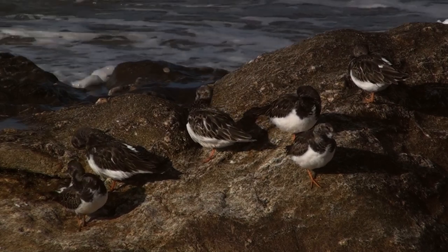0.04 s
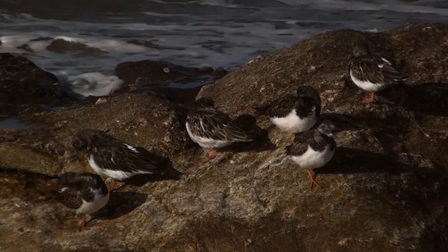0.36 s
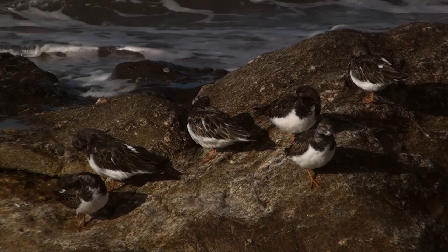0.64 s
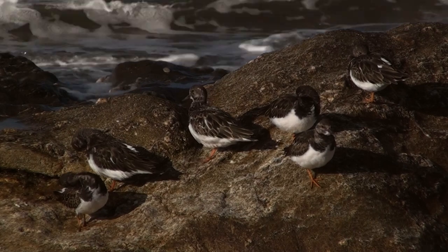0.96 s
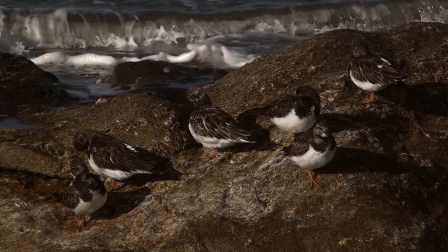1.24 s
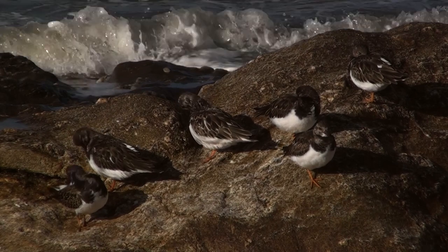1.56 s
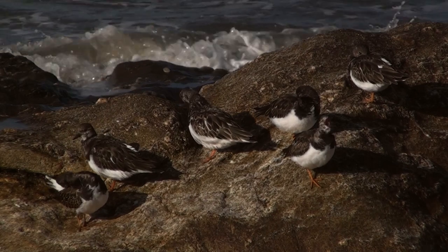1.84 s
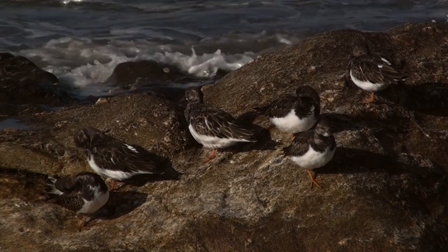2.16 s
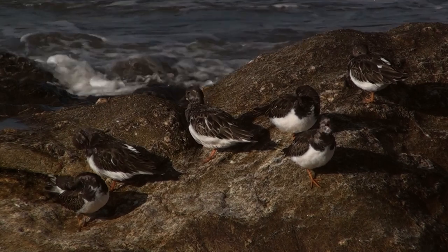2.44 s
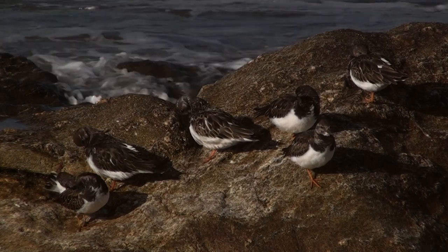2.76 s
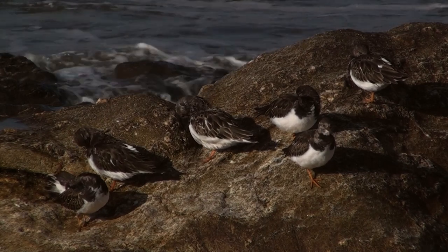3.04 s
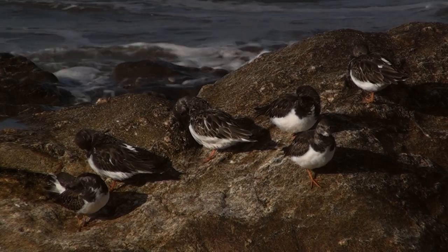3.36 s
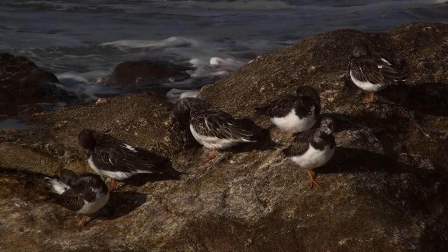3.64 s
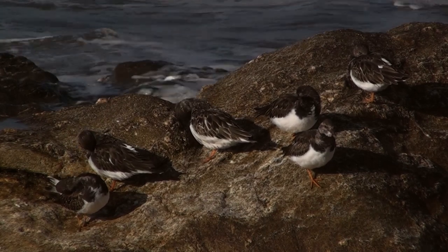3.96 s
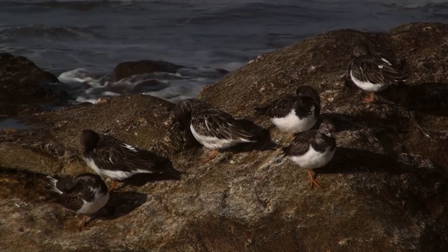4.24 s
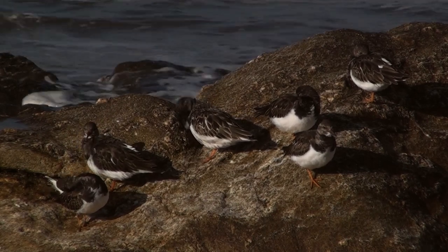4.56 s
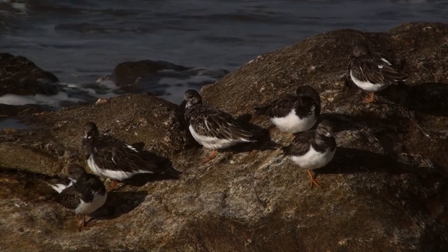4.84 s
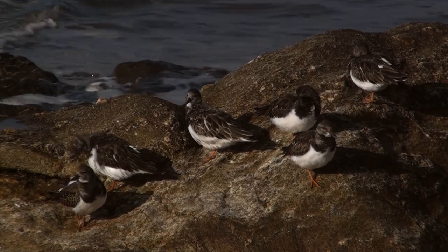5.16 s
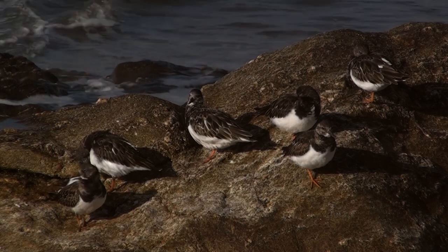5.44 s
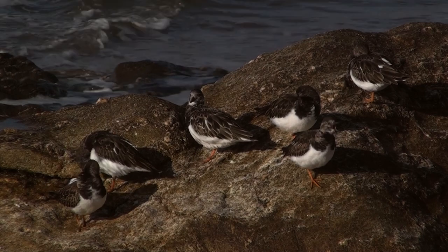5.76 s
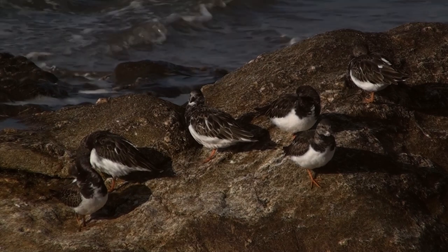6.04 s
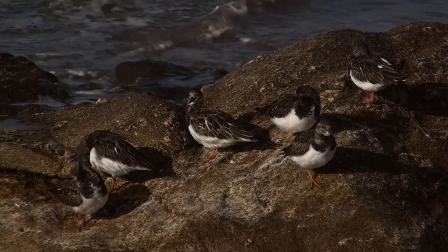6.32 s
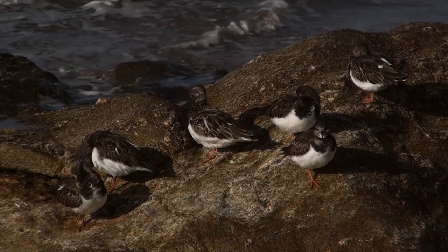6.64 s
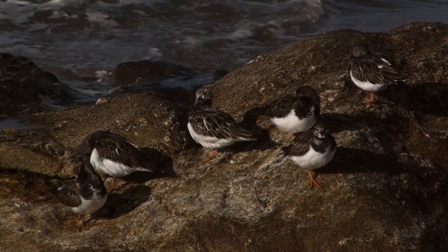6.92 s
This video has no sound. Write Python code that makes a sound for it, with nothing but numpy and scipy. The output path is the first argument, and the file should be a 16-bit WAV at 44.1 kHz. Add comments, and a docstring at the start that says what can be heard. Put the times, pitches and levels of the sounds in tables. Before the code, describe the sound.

Surf washes steadily on a rocky shore while a small bird repeats brief, high, slightly raspy single calls.

```python
"""From the start, surf rumbles steadily on a rocky shore: the sound of countless bursting bubbles. After 0.4 s
one short, high, falling call of a turnstone, a small shorebird, sounds, and it comes seven times, each time
alike. Each call cracks open, holds a clear tone whose second harmonic rings in the throat, then sags and frays.
A faint echo off the rocks and a thin ring follow each one. The hiss of foam slowly grows, and after the last
call, near 6 s, the sea goes on alone."""
import sys
import numpy as np
from scipy import signal
from scipy.fft import rfft, irfft, next_fast_len
from scipy.io import wavfile
from scipy.ndimage import uniform_filter1d

SR = 44100
rng = np.random.default_rng(int(sys.argv[2]) if len(sys.argv) > 2 else 0)


def transcribe(u):
    """Save the signal u as a 16-bit wav file named by the first command-line argument.

    u: samples, shape (n,) or (channels, n), limited to [-1, 1]; the rate is SR.
    q: integer samples, one column per channel.
    """
    v = np.clip(np.atleast_2d(u).T, -1, 1)
    q = np.round(v * 32767).astype(np.int16)
    wavfile.write(sys.argv[1], SR, q)


N = 317079

# How strong the surf is from low to high: frequency_hz, relative_level_db
SURF_SPECTRUM = [(22, -29), (50, -12), (100, -3.5), (140, -1.55), (205, 1), (335, -9.5), (490, -5.5),
                 (600, -8.5), (750, -15.5), (950, -15.5), (1280, -20.5), (3300, -28.5), (10300, -40.5),
                 (15000, -52.5)]
# How wide the surf sounds (left-right difference against the shared sound): frequency_hz, width_db
SURF_WIDTH = [(60, -35), (120, -44), (200, -27), (380, -17.5), (700, -11), (1290, -6.5), (2380, -5.5),
              (4400, -6.5), (8100, -6.5), (15000, -21)]
# How the sea rises and falls; only changes around each average count: time_s, wash_db, foam_db
SEA_LEVELS = [(0.0, -47.5, -60.5), (0.54, -46.5, -59.5), (1.24, -48, -60.5), (1.7, -47.5, -60),
              (2.98, -47, -59), (3.32, -48, -59.5), (4.35, -46, -59), (6.97, -45, -56),
              (7.19, -42.5, -55.5)]
# When each call begins: start_s
CALL_STARTS = [0.4, 1.72, 2.32, 2.88, 3.56, 4.32, 5.76]
# How well the throat and open bill let each frequency out: frequency_hz, gain_db
THROAT_GAIN = [(1250, -16), (1550, -24), (1820, -21), (2500, 0.5), (2800, -4.5), (3150, -0.5), (3680, -2),
               (4100, -21.5), (4700, -24.5), (5450, -31), (6100, -41), (7200, -34.5), (9000, -42.5),
               (11000, -59)]
# Where the tone breaks within a call: time_s, half_width_s, rasp_db, tone_dip_db
VOICE_BREAKS = [(.007, .003, -27, 7), (0.0121, .002, -35.5, -2.5), (0.071, 0.0074, -36, -1),
                (.088, .009, -41, 0), (.15, 0.016, -40.5, 1.8)]
# How the two microphones hear the bird: frequency_hz, left_minus_right_db, left_lead_radians
BIRD_STEREO = [(1800, 0.5, 0.27), (2900, 0.8, -0.02), (3500, -.5, 0.17), (4800, -0.5, 0.35),
               (5400, -5.5, 1.54), (7460, 9, 2), (8800, 8, 1)]

OPEN_S, PEAK_S, LET_GO_S = 0.0016, 0.019, 0.1432  # in each call: the voice opens, peaks and lets go


def undb(db):
    """Turn decibels into a number to multiply by."""
    return 10 ** (np.asarray(db) / 20)


def unit(x):
    """Scale a signal to an average (rms) level of 1."""
    return x / np.sqrt(np.mean(x ** 2))


def curves(table, size):
    """Join the points of a time table with straight lines, one value a sample."""
    times, *columns = np.transpose(table)
    return [np.interp(np.arange(size) / SR, np.sort(times), column) for column in columns]


def gain_at(table, hz):
    """Look up a frequency in a decibel table, on a scale of octaves, and return its gain."""
    table_hz, db = np.transpose(table)
    return undb(np.interp(np.log(np.maximum(hz, 1)), np.log(table_hz), db))


def colour(x, gain):
    """Turn each frequency up or down by gain(frequency)."""
    size = next_fast_len(x.shape[-1])
    hz = np.fft.rfftfreq(size, 1 / SR)
    return irfft(rfft(x, size) * gain(hz), size)[..., :x.shape[-1]]


def wobble(rate_hz, size):
    """A smooth random wobble, about 1 in size, that picks rate_hz new values a second."""
    step = max(int(SR / rate_hz), 1)
    held = np.repeat(rng.standard_normal(size // step + 1), step)
    return unit(uniform_filter1d(uniform_filter1d(held, step), step))[:size]


def bubbles(spread_db=2.5, near_share=0.29, count=20000):
    """Countless far bubbles blur into smooth noise; nearer ones pop one by one, in uneven sizes."""
    when = rng.integers(0, N, count)
    sizes = undb(spread_db * np.minimum(rng.exponential(size=count), 6))
    pops = np.bincount(when, sizes * rng.choice([-1, 1], count), N)
    return rng.standard_normal(N) + near_share * unit(pops)


def surf(level_db=-32, wash_hz=1400, foam_hz=9000, swell_db=0.06, flicker_db=0.5):
    """Churning water: the lows rumble steadily, the middle follows the wash, the highs the foam."""
    middle = colour(bubbles(), lambda f: gain_at(SURF_SPECTRUM, f))
    side = colour(bubbles(), lambda f: gain_at(SURF_SPECTRUM, f) * gain_at(SURF_WIDTH, f))
    sea = np.array([middle + side, middle - side]) * undb(level_db) / np.std(middle)
    wash_db, foam_db = (db - np.mean(db) for db in curves(SEA_LEVELS, N))
    centres_hz = np.geomspace(30, SR / 3, num=10)  # bands about an octave apart
    swell = wobble(3.1, N)
    out = 0
    for share, hz in zip(np.eye(len(centres_hz)), centres_hz):
        band = colour(sea, lambda f: np.interp(f, centres_hz, share))
        wash = np.clip(hz / wash_hz, 0, 1)
        foam = np.clip(np.log(hz / wash_hz) / np.log(foam_hz / wash_hz), 0, 1)
        motion_db = wash * (1 - foam) * wash_db + foam * foam_db
        out = out + band * undb(motion_db + swell_db * swell + flicker_db * wobble(12, N))
    return out


def since(t, start):
    """Seconds gone by since start; zero before it."""
    return np.maximum(t - start, 0)


def bump(t, centre, width):
    """A bell-shaped swell of height 1."""
    return np.exp(-((t - centre) / width) ** 2)


def noise_band(size, hz, width_hz):
    """A hiss of level 1 that holds only the frequencies around hz."""
    return unit(colour(rng.standard_normal(size), lambda f: 1 / (1 + (2 * (f - hz) / width_hz) ** 4)))


def crack(t, level_db=-33.5, hold_s=0.012, fade_db_per_s=2999.5):
    """A tiny burst of noise as the voice snaps open."""
    hiss = noise_band(len(t), hz=3930, width_hz=2000)
    return hiss * undb(level_db - fade_db_per_s * since(t, hold_s))


def pitch(t, top_hz=1812, scoop_hz=247.7, sag_hz=416, drop_hz_per_s=14000):
    """The pitch of a call in Hz: it scoops up, sags faster and faster, then drops away."""
    scoop = scoop_hz * bump(t, centre=0.0045, width=0.00685)
    sag = sag_hz * (since(t, PEAK_S) / (LET_GO_S - PEAK_S)) ** 2.12
    return top_hz - scoop - sag - drop_hz_per_s * since(t, LET_GO_S)


def effort(t, peak_db=-14.5, push_db=3.5, rise_db_per_s=598, tire_db_per_s=64.5, stop_db_per_s=1850):
    """How hard the bird sings, in dB: it swells, tires, pushes once more and lets go."""
    rise = rise_db_per_s * np.maximum(PEAK_S - t, 0)
    tiring = tire_db_per_s * since(t, PEAK_S)
    push = push_db * bump(t, centre=0.107, width=0.005)
    return peak_db - rise - tiring + push - stop_db_per_s * since(t, LET_GO_S)


def call(jitter=0.0022, flutter=0.0031, shimmer_db=0.84, harmonics=5):
    """The voice box makes a sliding tone and the throat shapes it; at each break it flutters and rasps."""
    size = SR // 6
    t = np.arange(size) / SR
    time_s, half_width_s, rasp_db, dip_db = np.transpose(VOICE_BREAKS)
    breaks = bump(t[:, None], time_s, half_width_s)  # one column for each break
    unsteadiness = jitter + flutter * breaks.sum(axis=1)
    hz = pitch(t) * (1 + unsteadiness * wobble(900, size))
    effort_db = effort(t) - breaks @ dip_db + shimmer_db * wobble(400, size)
    phase = 2 * np.pi * np.cumsum(hz) / SR
    # Harmonics are pure tones at 1, 2, 3... times the pitch.
    tone = sum(gain_at(THROAT_GAIN, k * hz) * np.sin(k * phase) for k in range(1, harmonics + 1))
    tone = np.sqrt(2) * tone * undb(effort_db)
    rasp = noise_band(size, hz=3330, width_hz=1190) * (breaks @ undb(rasp_db))
    opening = 1 - bump(since(t, OPEN_S), centre=0, width=0.00012)
    return opening * (tone + rasp + crack(t))


def microphones(f):
    """Two microphones hear the bird at slightly different levels and times, most of all in the highs."""
    hz, balance_db, lead_radians = np.transpose(BIRD_STEREO)
    sides = np.array([[0.5], [-0.5]])
    gain = undb(sides * np.interp(f, hz, balance_db))
    timing = np.exp(1j * sides * np.interp(f, hz, lead_radians))
    return gain / np.sqrt(np.mean(gain ** 2, axis=0)) * timing


def rock_echo(t, level_db=-34.5, fade_s=0.33):
    """The rocks scatter sound into a faint echo that falls 60 dB in fade_s."""
    scatter = rng.standard_normal((3, len(t))) * undb(-60 * t / fade_s)
    left_right = scatter[0] + 0.4 * scatter[1:]  # most of it reaches both sides alike
    return undb(level_db) * unit(left_right) / np.sqrt(len(t))


def thin_ring(t, hz=3110, gain_db=-12.5, fade_s=0.42):
    """One lingering note, woken as the falling call slides past it."""
    fade = undb(-60 * t / fade_s)
    return undb(gain_db) * 2 * fade / fade.sum() * np.sin(2 * np.pi * hz * t)


def bird():
    """The same turnstone call sounds again and again, each time alike; the echo and the ring trail each one."""
    voice = np.zeros(N)
    for start_s in CALL_STARTS:
        sound, first = call(), round(start_s * SR)
        voice[first:first + len(sound)] += sound
    t = np.arange(SR // 3) / SR
    trail = signal.fftconvolve(voice[None], rock_echo(t) + thin_ring(t), axes=1)[:, :N]
    return colour(voice, microphones) + trail


def scene():
    """The bird in front of the sea."""
    return bird() + surf()


def record(dry, top_hz=15400):
    """The recorder cuts away the very highest sounds."""
    return signal.sosfilt(signal.ellip(10, 0.1, 80, top_hz, fs=SR, output="sos"), dry)


dry = scene()
out = record(dry)
transcribe(out)
```